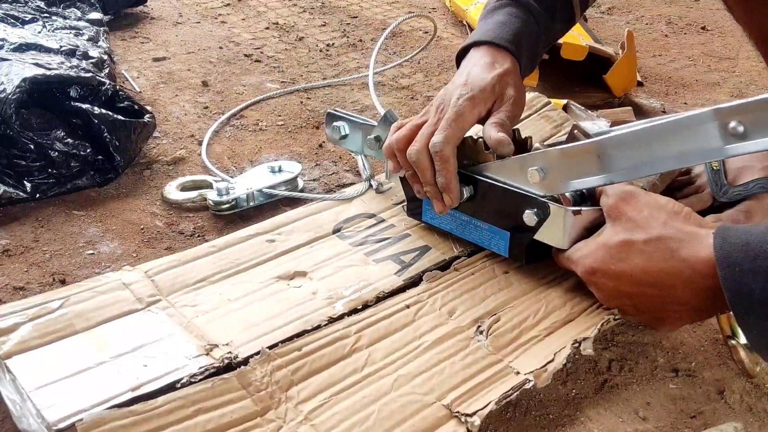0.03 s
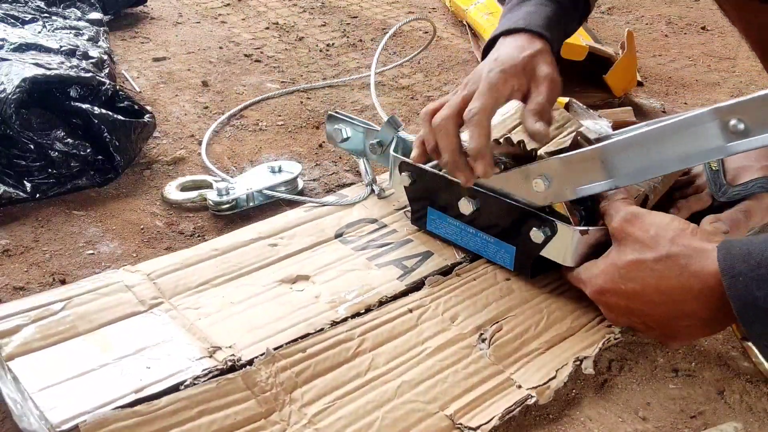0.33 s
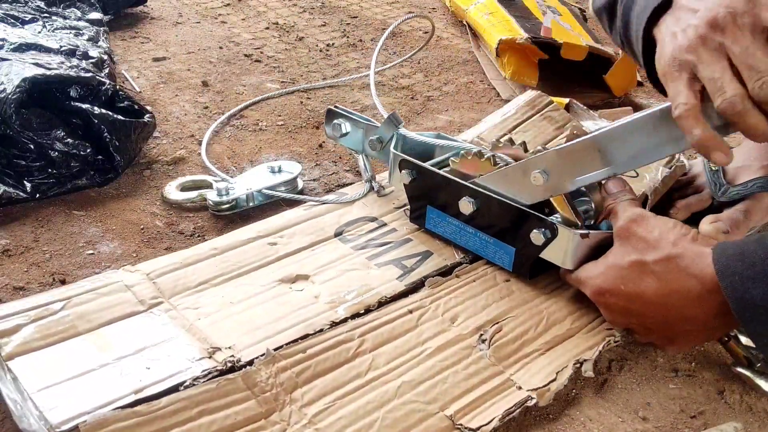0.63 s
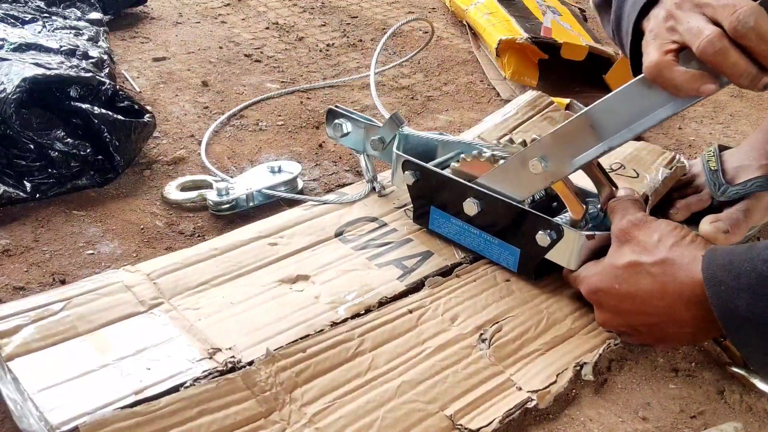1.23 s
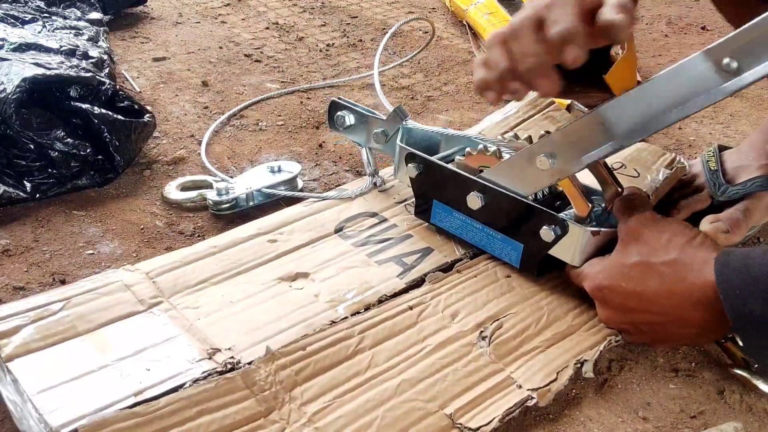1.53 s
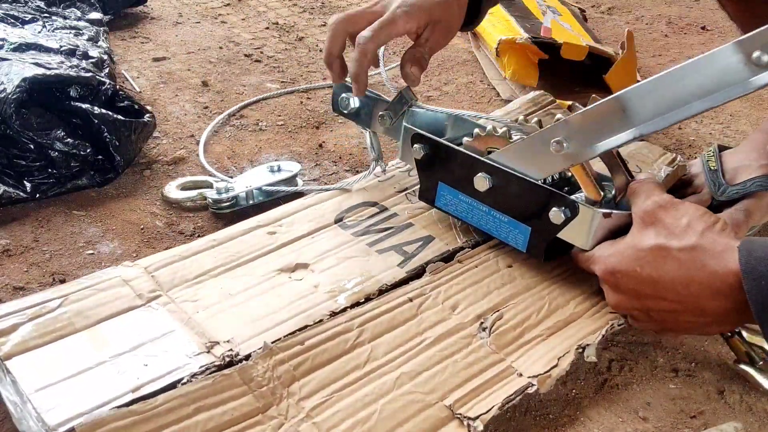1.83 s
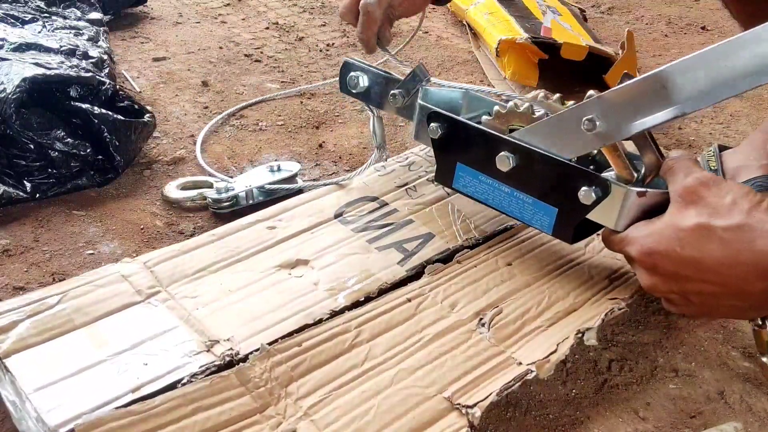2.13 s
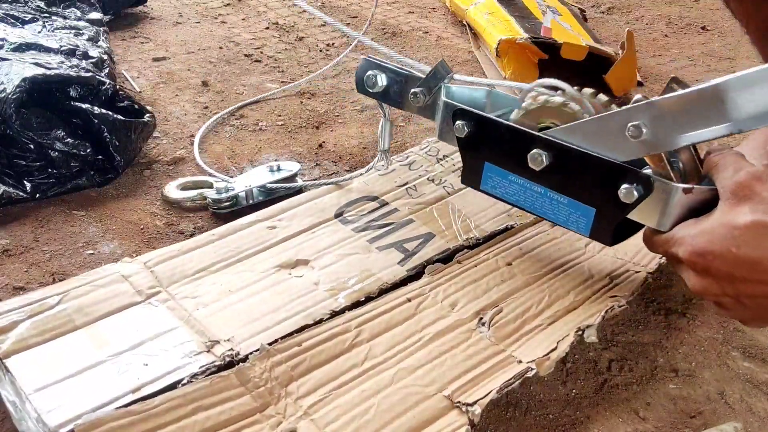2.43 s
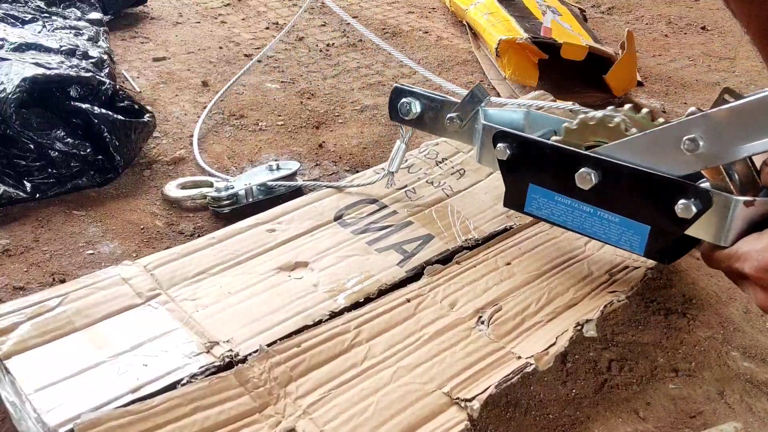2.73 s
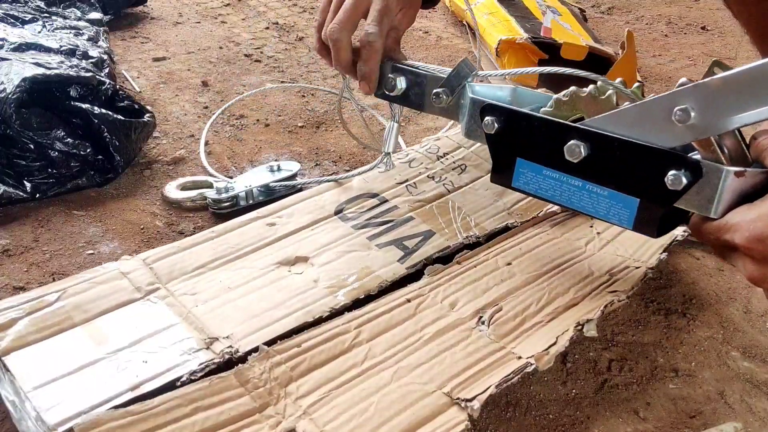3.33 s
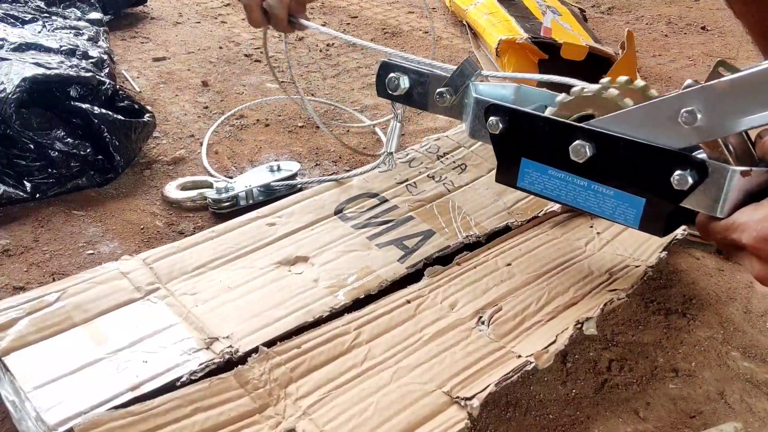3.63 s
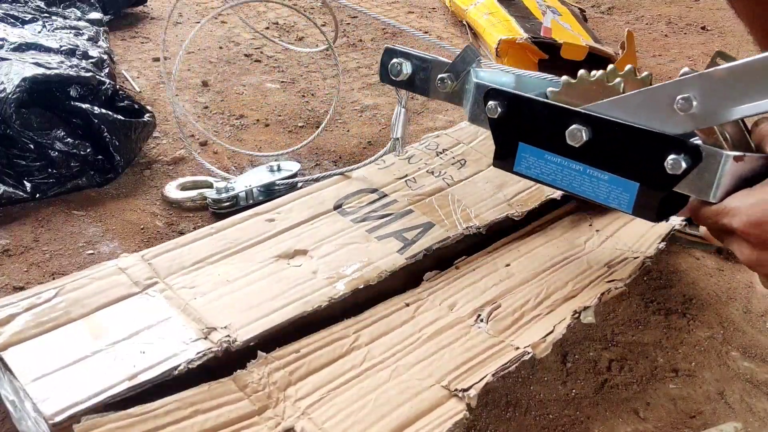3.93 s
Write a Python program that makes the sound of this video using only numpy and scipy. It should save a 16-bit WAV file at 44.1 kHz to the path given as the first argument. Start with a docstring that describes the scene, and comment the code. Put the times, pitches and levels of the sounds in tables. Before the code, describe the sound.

A hand winch clicks, then its drum rattles and rings as cable is tugged out.

```python
"""On open ground, steel cable is pulled in three tugs off a hand winch that stands on cardboard.
The drum chatters in its ringing frame, wire strands rasp over the steel and ratchet teeth catch.
Before the first tug the pawl snaps; around the tugs the lever knocks and hands shift the winch.
Behind it the air rumbles softly, and insects whine far off and die away."""
import sys
import numpy as np
from scipy import signal
from scipy.fft import rfft, irfft
from scipy.io import wavfile
from scipy.ndimage import uniform_filter1d

SR = 44100
rng = np.random.default_rng(int(sys.argv[2]) if len(sys.argv) > 2 else 0)


def materialize(psi):
    """Save the field psi as 16-bit PCM at rate SR to the path in sys.argv[1].

    A 1-D psi becomes a single channel; in a 2-D psi each row is a channel.
    """
    bounded = np.clip(np.atleast_2d(psi).T, -1, 1)
    quanta = np.round(bounded * 32767).astype(np.int16)
    wavfile.write(sys.argv[1], SR, quanta)


N = 176400
T = np.arange(N) / SR
RING_T = T[:SR // 5]   # time axis of one ring-out


def from_db(db):
    """Decibels to gain."""
    return 10 ** (np.asarray(db) / 20)


def unit_rms(x):
    """Normalise to an RMS of one."""
    return x / np.sqrt(np.mean(x ** 2) + 1e-20)


def unit_energy(x):
    """Normalise to a mean energy of one per channel."""
    return unit_rms(x) / np.sqrt(x.shape[-1])


def at_hz(curve, hz):
    """Read a curve along a log frequency axis."""
    curve_hz, values = np.transpose(curve)
    return np.interp(np.log(hz), np.log(curve_hz), values)


def panned(db):
    """Stereo gains with the left side db above the right."""
    return from_db(np.array([[db], [-db]]) / 2)


def gesture(times, levels_db):
    """Force envelope, silent outside its breakpoints."""
    lead_s = 0.0053   # the push comes before the ringing that it builds up
    return from_db(np.interp(T + lead_s, times, levels_db, left=-150, right=-150))


# Stereo image, tight in the bass and wide in the treble: f/Hz, left-right correlation
STEREO_IMAGE = [(30, 0.48), (130, 0.97), (300, 0.83), (700, 0.78), (1150, 0.73), (1500, -0.0054),
                (2500, -0.23), (10000, -0.039)]
def stereo_phase(hz):
    """Left and right phase offsets that give a tone its width."""
    return np.arccos(at_hz(STEREO_IMAGE, hz)) * np.array([[-0.5], [0.5]])


def noise(colour, size):
    """Mid-side noise shaped by an EQ curve."""
    hz = np.maximum(np.fft.rfftfreq(size, 1 / SR), 1)
    correlation = at_hz(STEREO_IMAGE, hz)
    mid, side = rfft(rng.standard_normal((2, size)))
    stereo = np.sqrt(1 + correlation) * mid + np.sqrt(1 - correlation) * side * [[1], [-1]]
    return unit_rms(irfft(stereo * from_db(at_hz(colour, hz)) * (hz > 10), size))


def dense_ring(colour, t60, tail_db, tail_t60):
    """Many close resonances: a quick decay and a weaker, longer tail."""
    decay = from_db(-60 * RING_T / t60) + from_db(tail_db - 60 * RING_T / tail_t60)
    return unit_energy(noise(colour, len(RING_T)) * decay)


def mode_ring(modes):
    """Struck steel: decaying sines, each with its own pan."""
    ring = 0
    for hz, db, t60, pan_db in modes:
        wave = np.sin(2 * np.pi * (hz * RING_T + rng.random()) + stereo_phase(hz))
        ring += panned(pan_db) * wave * from_db(db - 60 * RING_T / t60)
    attack = 1 - np.exp(-RING_T / 0.0013)   # each partial swells in over about a millisecond
    return unit_energy(ring * attack)


def excite(force, ring):
    """Play a mono force through a stereo resonator."""
    return signal.oaconvolve(force[None], ring, axes=1)[:, :N]


def contacts(times, levels_db, skid_s):
    """Each contact is a brief, rough skid that dies away quickly."""
    force = np.zeros(N + SR)
    for s, db in zip(times, levels_db):
        skid = rng.standard_normal(len(RING_T)) ** 3 * np.exp(-RING_T / skid_s)
        force[int(s * SR):][:len(skid)] += from_db(db) * unit_energy(skid)
    return force[:N]


def grains(per_s, spread_db, hiss_db):
    """Random small impacts over smooth friction, at an even mean power."""
    sizes = from_db(spread_db * np.minimum(rng.exponential(1, N), 4)) * rng.choice([-1, 1], N)
    impacts = unit_rms(sizes * (rng.random(N) < per_s / SR))
    grit = impacts + from_db(hiss_db) * rng.standard_normal(N)
    return grit / np.sqrt(uniform_filter1d(grit ** 2, SR // 50) + 1e-9)


def scrape(force, make_ring, per_s, spread_db, hiss_db):
    """Grains wander between three contact points, each ringing in its own way."""
    shifts_per_s, swing_db = 18, 13
    knots = np.arange(200) / shifts_per_s
    drift = np.array([np.interp(T, knots, row) for row in rng.standard_normal((3, 200))])
    shares = from_db(swing_db * drift)
    shares /= np.sqrt(np.sum(shares ** 2, axis=0))   # equal-power crossfade
    return sum(excite(force * share * grains(per_s, spread_db, hiss_db), make_ring()) for share in shares)


# EQ of the open air: f/Hz, relative level/dB
AIR_EQ = [(25, 1.5), (45, 2), (80, -12), (160, -8.5), (300, -18.5), (600, -23.5), (1500, -26.5),
          (3200, -29), (5700, -37.5), (7100, -25.5), (8800, -36.5), (11000, -44.5), (14500, -52)]
def air():
    """A bed of low rumble and far hiss."""
    return from_db(-54.5) * panned(-1.6) * noise(AIR_EQ, N)


# Bands of the insects' whine: f/Hz, width/Hz, level/dB before the fade
INSECT_BANDS = [(3176, 200, -75), (6310, 500, -71), (12650, 370, -72)]
# Their fade: t/s, gain/dB
INSECT_FADE = [(0, 8), (.55, 6), (1.0, 0.5), (1.5, -8), (2.1, -4), (2.8, -26), (4, -16)]
def insects():
    """Distant insects whine in narrow noise bands and die away."""
    whine = 0
    for hz, width_hz, db in INSECT_BANDS:
        band = signal.butter(2, [hz - width_hz / 2, hz + width_hz / 2], "band", fs=SR, output="sos")
        whine += from_db(db) * unit_rms(signal.sosfilt(band, rng.standard_normal((2, N))))
    return whine * from_db(np.interp(T, *np.transpose(INSECT_FADE)))


# EQ of scuffed cardboard: f/Hz, relative level/dB
CARDBOARD_EQ = [(100, -11), (220, 4), (350, -3.5), (480, 5.5), (650, 1.5), (850, 3.5), (1100, 2.5),
                (1700, -4.5), (3200, -15.5), (4300, -11.5), (5600, -28), (14000, -43)]
def cardboard_ring():
    """Cardboard hardly rings."""
    return dense_ring(CARDBOARD_EQ, t60=0.018, tail_db=-14, tail_t60=0.11)


# Hand moves, one envelope each: t/s, relative level/dB
HAND_MOVES = [
    [(1.0, -81), (1.03, -52.5), (1.07, -67), (1.11, -51.5), (1.15, -43), (1.2, -65)],
    [(2.98, -56.5), (3.06, -49.5), (3.1, -46.5), (3.17, -42), (3.23, -43), (3.3, -40), (3.42, -55.5),
     (3.48, -44.5), (3.58, -57.5)],
]
def scuffs():
    """Hands shift the winch and slack cable over the cardboard, dull and gritty."""
    force = from_db(-6) * sum(gesture(*np.transpose(move)) for move in HAND_MOVES)
    return scrape(force, cardboard_ring, per_s=170, spread_db=4, hiss_db=-6)


# Bumps on the cardboard: t/s, starting level/dB, f/Hz
BUMPS = [(2.447, -38, 75), (2.508, -32.5, 76), (3.203, -27.5, 305), (3.21, -35, 243)]
def thuds():
    """The base bumps down with a soft, heavily damped tone."""
    t60_cycles = 4.9
    out = np.zeros(N + SR)
    for s, db, hz in BUMPS:
        cycles = hz * RING_T
        thud = np.sin(2 * np.pi * cycles) * from_db(db - 60 * cycles / t60_cycles)
        out[int(s * SR):][:len(thud)] += thud
    return out[:N]


# Wire hits on the steel edges: t/s, level/dB
WIRE_HITS = [(0.161, -27), (.284, -28), (3.188, -26)]
# Their crisp EQ: f/Hz, relative level/dB
WIRE_EQ = [(4000, -15), (8000, 4.5), (14000, -8)]
def wire_ticks():
    """Wire flicks an edge: thin, dry ticks with hardly any ring."""
    force = contacts(*np.transpose(WIRE_HITS), skid_s=0.0002)
    return excite(force, dense_ring(WIRE_EQ, t60=0.008, tail_db=-24, tail_t60=0.06))


# Partials of frame and drum: f/Hz, relative level/dB, t60/s, left over right/dB
FRAME_MODES = [(1108, 2, 0.09, -1.5), (1249.6, 10, 0.023, -8), (1379.4, -2, 0.074, 14.5),
               (1407.4, -3, 0.067, 13.5), (1698, -2.5, 0.057, 0), (2269, -8, 0.05, 14),
               (2389, -6, 0.031, -15.5), (2772, -8.5, 0.058, -14.5)]
# EQ of the clang around them: f/Hz, relative level/dB
FRAME_EQ = [(500, -14.5), (930, -7), (1120, -8.5), (1420, -0.5), (1600, -5.5), (1950, 0.5), (2400, -1.5),
            (2850, -2), (3200, -2.5), (8000, -19.5)]
def frame_ring():
    """The clang of the side plates and drum."""
    partials = mode_ring(FRAME_MODES)
    clang = dense_ring(FRAME_EQ, t60=0.054, tail_db=-7, tail_t60=0.18)
    return partials + from_db(-5) * clang


def rippled(ring):
    """Each spot on the steel favours its own random set of resonances."""
    spacing_hz, depth_db = 170, 5
    hz = np.fft.rfftfreq(len(RING_T), 1 / SR)
    bumps = np.clip(rng.standard_normal(200), -1.4, 1.4)
    ripple = from_db(depth_db * np.interp(hz / spacing_hz, np.arange(200), bumps))
    cepstrum = irfft(np.log(ripple), len(RING_T))
    minimum_phase = np.exp(rfft(2 * cepstrum * (RING_T < RING_T[-1] / 2)))   # keeps the attack sharp
    return unit_energy(irfft(rfft(ring) * minimum_phase, len(RING_T)))


# Partials of the ratchet wheel: f/Hz, relative level/dB, t60/s, left over right/dB
WHEEL_MODES = [(2975, -0.5, 0.13, 0), (3645, 6.5, 0.055, 9), (4250, 1, 0.067, -20),
               (4723, -3, 0.027, -25.5), (4874, 13, 0.04, 0), (6320, 6.5, 0.024, -5), (6930, 6, 0.046, -19),
               (7650, 7.5, 0.0094, -31), (7850, 6.5, 0.021, -20), (8490, 6, 0.017, 12),
               (12040, -1, 0.025, 18)]
# EQ of bright steel, for wheel and pawl: f/Hz, relative level/dB
STEEL_EQ = [(1000, -26), (2100, -5.5), (2900, -20), (3200, -5), (3700, 1.5), (5300, 2), (5800, -1.5),
            (7300, 5), (8600, -1.5), (10200, -11), (12000, -5.5), (14500, -23.5)]
def wheel_ring():
    """The bright ring of the toothed wheel."""
    partials = mode_ring(WHEEL_MODES)
    sizzle = rippled(dense_ring(STEEL_EQ, t60=0.018, tail_db=-14, tail_t60=0.17))
    return from_db(-3) * partials + from_db(0.5) * panned(-0.93) * sizzle


# Light knocks: t/s, then relative level/dB of base, frame and wheel
LEVER_HITS = [(.04, -51.5, -67, -66), (0.082, -55.5, -62, -55), (0.106, -60, -51, -53),
              (0.281, -52, -46, -47.5), (.329, -63, -58.5, -62), (0.417, -60, -61, -72),
              (.528, -77, -60, -59), (.625, -53.5, -46.5, -47.5), (0.657, -49, -50, -44.5),
              (1.082, -50, -60, -71), (1.528, -60, -57.5, -77), (1.723, -55, -40.5, -51),
              (1.805, -70, -46, -72), (2.185, -65, -45, -58), (3.026, -42.5, -59, -64),
              (3.046, -37.5, -63, -48.5), (3.202, -41.5, -43, -42), (3.353, -46, -54, -58),
              (3.452, -40.5, -56, -49.5), (3.603, -54, -48.5, -44.5)]
# EQ of the hand-damped frame: f/Hz, relative level/dB
DAMPED_FRAME_EQ = [(400, -22), (950, -8), (1250, 7), (1800, 1), (2450, 9), (3500, 0), (9000, -36)]
def lever_knocks():
    """Dry clacks of lever and fittings, damped by the hands."""
    times, base_db, frame_db, wheel_db = np.transpose(LEVER_HITS)
    damped_ring = dense_ring(DAMPED_FRAME_EQ, t60=0.013, tail_db=-7.5, tail_t60=0.14)
    base = excite(contacts(times, base_db + 25.5, skid_s=0.0013), cardboard_ring())
    frame = excite(contacts(times, frame_db + 29, skid_s=0.0058), damped_ring)
    wheel = excite(contacts(times, wheel_db + 21, skid_s=0.014), wheel_ring())
    return base + frame + wheel


# The pawl's snap and bounce: t/s, relative level/dB
PAWL_HITS = [(0.6733, -5), (0.6814, -12)]
# Partials of the pawl: f/Hz, relative level/dB, t60/s, left over right/dB
PAWL_MODES = [(3440, -3, 0.13, 5), (3467, -4.5, 0.18, -4), (5110, 7, 0.079, -4), (6891, 10.5, 0.072, 3),
              (7900, 7, 0.098, 6), (8520, 10, 0.058, 10), (13150, 0, .05, 6)]
def pawl():
    """The sprung pawl drops onto the wheel with a hard clack and a short clink."""
    clink = from_db(-2) * mode_ring(PAWL_MODES)
    clack = from_db(-3) * dense_ring(STEEL_EQ, t60=0.011, tail_db=-19, tail_t60=0.12)
    return excite(contacts(*np.transpose(PAWL_HITS), skid_s=0.0002), clink + clack)


# Single resonances that swell and fade: crest t/s, length/s, f/Hz, level/dB
STEEL_SWELLS = [(2.412, 0.11, 6800, -32.5), (2.424, 0.021, 4780, -23.5), (2.464, 0.27, 2740, -33.5),
                (2.478, 0.23, 1710, -27.5), (2.596, 0.039, 1266, -21.5), (2.603, 0.079, 1389, -29),
                (3.756, 0.064, 1416, -24), (3.753, 0.046, 3640, -28), (3.775, 0.13, 6230, -26),
                (3.782, 0.17, 2370, -29), (3.78, 0.065, 4650, -36), (3.863, 0.072, 2730, -32.5),
                (3.916, 0.061, 1088, -23.5)]
def singing_steel():
    """The sliding cable feeds one resonance after another; each sings briefly with an unsteady pitch."""
    out = 0
    for crest_s, length_s, hz, db in STEEL_SWELLS:
        width_hz = 18.3 + 0.0062 * hz
        pole = np.exp((2j * np.pi * hz - np.pi * width_hz) / SR)
        tone = signal.lfilter([1], [1, -2 * pole, pole ** 2], rng.standard_normal(N))
        tone /= np.sqrt(uniform_filter1d(np.abs(tone) ** 2, SR // 50))   # even out the level
        stereo = np.sqrt(2) * np.real(tone * np.exp(1j * stereo_phase(hz)))
        arch = np.cos(np.pi * np.clip((T - crest_s) / length_s, -0.5, 0.5))
        out += from_db(db) * arch * stereo
    return panned(-2.3) * out


# Teeth catching during the tugs: t/s, then relative level/dB of frame and wheel
TOOTH_HITS = [(2.401, -19, -42), (2.4468, -47, -27), (2.5141, -19.5, -21.5), (2.5854, -18.5, -50),
              (2.6493, -23.5, -20), (2.6605, -18, -27), (2.704, -51, -24), (2.7217, -41, -37),
              (2.742, -26.5, -27), (2.8452, -23.5, -39.5), (3.632, -23.5, -49), (3.694, -20, -32),
              (3.7271, -21.5, -28), (3.847, -12, -19)]
def ratchet_teeth():
    """Ratchet teeth catch and strike frame and wheel."""
    times, frame_db, wheel_db = np.transpose(TOOTH_HITS)
    frame = excite(contacts(times, frame_db + 22, skid_s=0.0048), frame_ring())
    wheel = excite(contacts(times, wheel_db + 26, skid_s=0.0036), wheel_ring())
    return frame + wheel


# EQ of the base on the cardboard: f/Hz, relative level/dB
BASE_EQ = [(30, 2), (60, -30), (120, -20), (240, -2), (380, -8), (490, 6.5), (620, -2.5), (820, 2),
           (1100, -12), (2500, -57)]
def base_rumble(drum):
    """The drum shakes the base, which answers dully and with a smaller swing in level."""
    shake = from_db(-29) * drum ** 0.62 * rng.standard_normal(N)
    return excite(shake, dense_ring(BASE_EQ, t60=0.19, tail_db=-8, tail_t60=0.22))


# Envelopes of the three tugs: t/s, then relative level/dB of drum chatter and cable rasp
FIRST_PULL = [(1.19, -64, -84), (1.274, -39, -55), (1.346, -34, -45), (1.42, -39, -68), (1.44, -56, -74),
              (1.5, -67, -92)]
LONG_PULL = [(2.1, -67, -65), (2.134, -55.5, -66), (2.246, -41.5, -46.5), (2.314, -40, -51.5),
             (2.416, -27, -19), (2.44, -21, -24.5), (2.49, -27.5, -26), (2.514, -19, -22),
             (2.536, -22.5, -34), (2.608, -22.5, -30), (2.662, -20, -20.5), (2.68, -24, -25),
             (2.754, -29.5, -36), (2.769, -23, -25.5), (2.8, -35.5, -49), (2.835, -40.5, -54),
             (2.847, -30, -45), (2.971, -58.5, -70)]
LAST_PULL = [(3.581, -55.5, -59), (3.625, -43, -61), (3.64, -40.5, -45.5), (3.68, -35.5, -51),
             (3.698, -33.5, -33), (3.715, -34.5, -31.5), (3.742, -21, -23), (3.799, -20.5, -19.5),
             (3.821, -25.5, -35), (3.84, -28.5, -28.5), (3.852, -22.5, -21), (3.88, -23, -26),
             (3.925, -23, -31), (3.944, -36, -52), (4.0, -46, -62)]
def tugs():
    """The running cable rasps on the wheel; the drum chatters in the frame and shakes the base."""
    drum = cable = 0
    for pull in (FIRST_PULL, LONG_PULL, LAST_PULL):
        times, drum_db, cable_db = np.transpose(pull)
        drum += gesture(times, drum_db)
        cable += gesture(times, cable_db)
    rumble = base_rumble(drum)
    chatter = scrape(from_db(-0.5) * drum, frame_ring, per_s=300, spread_db=0, hiss_db=-13)
    rasp = scrape(from_db(-1.14) * cable, wheel_ring, per_s=420, spread_db=3.5, hiss_db=-19)
    return rumble + chatter + rasp


def notched(x):
    """A band that the steel hardly radiates leaves a deep, narrow notch."""
    edges_hz = [3065, 3275]
    return signal.sosfilt(signal.butter(2, edges_hz, "bandstop", fs=SR, output="sos"), x)


def scene():
    """The running winch up front, handling noises around it, insects and air behind."""
    winch = notched(tugs() + ratchet_teeth()) + singing_steel()
    handling = thuds() + lever_knocks() + wire_ticks() + pawl() + scuffs()
    return winch + handling + insects() + air()


def record(dry):
    """A steep low-pass takes off the very top."""
    cutoff_hz = 14300
    return signal.sosfilt(signal.ellip(10, 0.2, 80, cutoff_hz, fs=SR, output="sos"), dry)


dry = scene()
out = record(dry)
materialize(out)
```